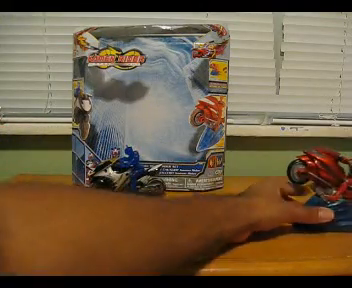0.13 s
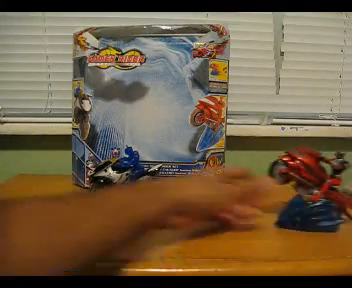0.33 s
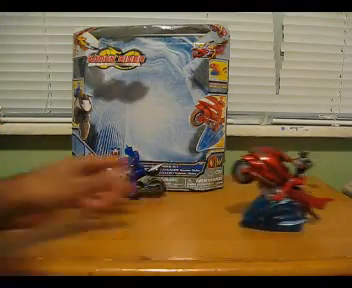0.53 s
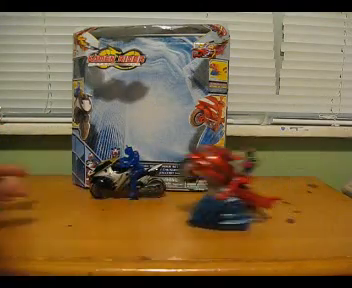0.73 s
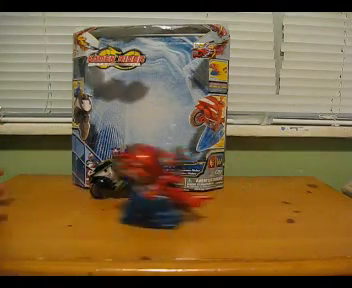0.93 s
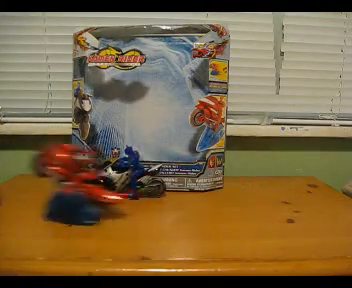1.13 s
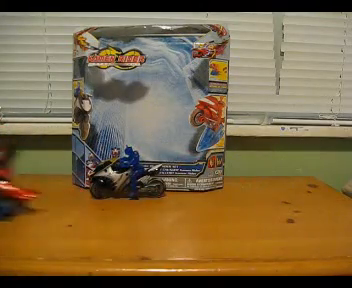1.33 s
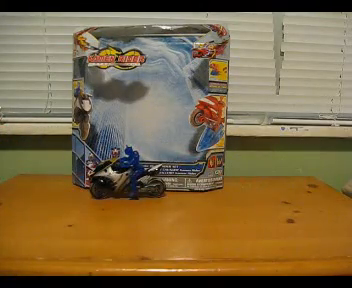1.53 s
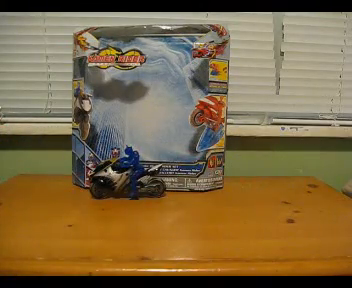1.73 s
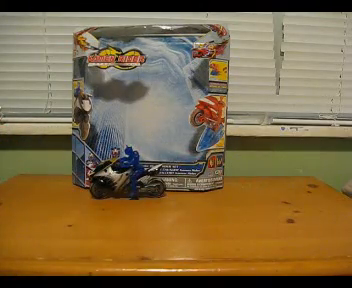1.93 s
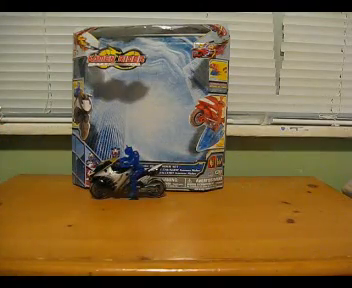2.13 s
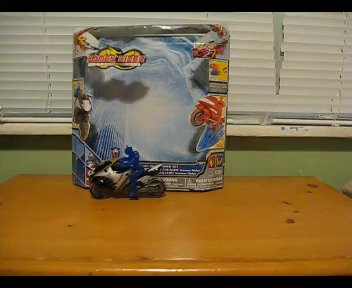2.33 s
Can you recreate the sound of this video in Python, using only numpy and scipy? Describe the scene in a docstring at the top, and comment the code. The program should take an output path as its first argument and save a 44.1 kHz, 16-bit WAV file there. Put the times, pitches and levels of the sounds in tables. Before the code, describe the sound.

A pull-back toy vehicle on a hollow wooden table: a faint handling bump at the start, near quiet, then light clicks from 0.4 s. From 0.55 s wheels rumble, gears whir and loose plastic clacks, strongest around 1.0-1.45 s. At about 1.5 s the unloaded gears whine up, peak near 1.65 s and fall by 1.9 s. Sparse ticks follow until 2.3 s, over soft hiss and faint electrical ticking in a small room.

```python
"""Pull-back toy on a hollow table

A pull-back toy rolls over a wooden table: wheel bumps ring the board, gears whir, the loose plastic shell clacks.
Lifted off, its gears race free: one pulse per tooth makes a whine that rises and falls. They tick to rest.
A small quiet room answers with a short noise-like tail; the camera adds shaped hiss and a faint electrical tick."""
import sys
import numpy as np
from scipy import signal
from scipy.fft import rfft, irfft, next_fast_len
from scipy.io import wavfile
from scipy.ndimage import uniform_filter1d, map_coordinates

SR = 44100
rng = np.random.default_rng(int(sys.argv[2]) if len(sys.argv) > 2 else 0)


def how_loud(loudness_db):
    """Turn decibels into a plain amplitude multiplier (0 dB gives 1, 20 dB gives 10)."""
    steps = np.asarray(loudness_db, float) / 20
    return 10 ** steps


def output_pcm(signal):
    """Save a mono or channel-first signal as 16-bit PCM at the path in sys.argv[1].

    Samples are clipped to [-1, 1] before scaling.
    """
    pcm = np.clip(np.atleast_2d(signal).T, -1, 1) * 32767
    wavfile.write(sys.argv[1], SR, np.round(pcm).astype(np.int16))


N = 110161  # length of the sound in samples

# Resonances of the table board: (centre [Hz], width [Hz], level [dB])
BOARD = [(160, 60, -6), (240, 24, -5), (322, 18, 5), (592, 34, -2), (825, 40, 3), (1088, 28, 2),
         (1310, 60, -2), (1525, 50, -4), (1790, 50, -4), (2250, 70, -5)]
# Resonances of the plastic toy shell: (centre [Hz], width [Hz], level [dB])
SHELL = [(2124, 200, -4.5), (3070, 124, 10), (4390, 330, 3), (5570, 124, 10.5), (6200, 570, -1),
         (9240, 170, -5)]
# Resonances of the gearbox: (centre [Hz], width [Hz], level [dB])
GEARBOX = [(2860, 380, -4), (4120, 440, 2.5), (5750, 800, -10)]


def unit(x):
    """Scales a sound to an rms of 1."""
    return x / np.sqrt(np.mean(x ** 2) + 1e-20)


def curves(rows):
    """One value per sample for each column; 60 dB lower outside the table."""
    s, *columns = np.transpose(rows)
    time = np.arange(N) / SR
    return [np.interp(time, s, c, left=c[0] - 60, right=c[-1] - 60) for c in columns]


def along(points, hz):
    """Reads a curve of (frequency, value) points on a logarithmic frequency scale."""
    f, value = np.transpose(points)
    return np.interp(np.log(hz + 1), np.log(f + 1), value)


def wobble(rate):
    """A smooth random curve with rate knots a second."""
    knots = rng.standard_normal(int(N * rate / SR) + 4)
    return map_coordinates(knots, [np.arange(N) * rate / SR])


def filtered(x, response):
    """Multiplies the spectrum by a response given as a function of frequency."""
    m = next_fast_len(x.shape[-1] + 8192)
    spectrum = rfft(x, m) * response(np.fft.rfftfreq(m, 1 / SR))
    return irfft(spectrum, m)[..., :x.shape[-1]]


def colour(x, points):
    """Shapes the tone with a curve of (frequency [Hz], level [dB]) points."""
    return filtered(x, lambda hz: how_loud(along(points, hz)))


def body(x, peaks, between_db):
    """Resonances of alternating sign over a flat direct path at between_db."""
    def response(f):
        total = how_loud(between_db)
        for k, (centre, width, db) in enumerate(peaks):
            resonance = 1j * f * width / (centre * centre - f * f + 1j * f * width)
            total = total + (-1) ** k * how_loud(db) * resonance
        return total
    return filtered(x, response)


def grit(rate, spread_db):
    """Random bumps of uneven size, about rate of them a second."""
    hits = rng.random(N) < rate / SR
    extra_db = spread_db * rng.exponential(size=N).clip(0, 3.5)
    return hits * rng.standard_normal(N) * how_loud(extra_db)


def hiss():
    """Steady random noise, shaped in tone like the camera's hiss."""
    # Tone of the hiss: (frequency [Hz], level [dB])
    hiss_tone = [(15, -52), (30, 2), (55, -10), (150, -8), (700, -3), (1400, -5.5), (2400, -12),
                 (5000, -19), (14400, -24)]
    return how_loud(-44.5) * unit(colour(rng.standard_normal(N), hiss_tone))


def buzz():
    """Electrical ticks of alternating sign: quick rise, exponential fall."""
    first_s, period_s = .0158, .02
    slip_after_s, slip_s = 1.2, -.0099  # the later ticks all come a little early
    rise_s, fall_s = .00004, .00019
    s = np.arange(first_s, N / SR, period_s)
    at = np.round((s + slip_s * (s > slip_after_s)) * SR).astype(int) - 3  # starts 3 samples ahead
    ticks, t = np.zeros(N + SR), np.arange(60) / SR
    ticks[at] = (-1.) ** np.arange(len(s)) * how_loud(rng.standard_normal(len(s)))
    shape = np.exp(-t / fall_s) * (1 - np.exp(-t / rise_s))
    return how_loud(-26.5) * np.convolve(ticks, shape)[:N]


def room(x):
    """Echoes blur into a short dying noise, different in each channel; high sounds die sooner."""
    # Time to fall by 60 dB: (frequency [Hz], time [s])
    decay = [(300, 0.44), (3000, 0.25), (10000, 0.14)]
    hz, t, z = signal.stft(rng.standard_normal((2, SR // 3)), SR, nperseg=256)
    tail = signal.istft(z * how_loud(-60 * t / along(decay, hz)[:, None]), SR, nperseg=256)[1]
    late = np.pad(x, (200, 0))[None]  # the answer starts 200 samples later
    return signal.fftconvolve(late, tail / np.linalg.norm(tail[0]), axes=1)[:, :N]


def free_run():
    """Unloaded gears: one uneven pulse per tooth, plus rattle, both ringing the gearbox."""
    # Speed of the gears: (time [s], teeth meeting [Hz], whine boost [dB])
    mesh = [(1.47, 400, 0), (1.51, 600, 2), (1.54, 845, 2), (1.57, 1060, 2), (1.6, 1300, 2),
            (1.62, 1395, 1), (1.65, 1520, -1), (1.68, 1420, -3), (1.71, 1350, -6), (1.75, 950, -9),
            (1.9, 400, -12)]
    # Free run and coast: (time [s], level [dB])
    free_level = [(1.46, -62), (1.466, -36.5), (1.558, -21.5), (1.62, -20.5), (1.746, -21), (1.892, -59),
                  (1.972, -41.5), (2.16, -48.5), (2.25, -55)]
    # Tone of the racing gears: (frequency [Hz], level [dB])
    race_tone = [(300, -50), (600, -22), (1200, -11), (2400, -8), (4200, -3), (6500, -6), (12000, -13),
                 (14500, -26)]
    jitter = .025  # timing scatter of a tooth, share of a period
    s, hz, boost_db = np.transpose(mesh)
    time = np.arange(N) / SR
    tooth_hz = np.interp(time, s, hz)
    teeth_passed = np.cumsum(tooth_hz * (1 + .008 * wobble(120))) / SR
    count = np.arange(1, int(teeth_passed[-1]))
    at = np.interp(count + jitter * rng.standard_normal(len(count)), teeth_passed, np.arange(N))

    # each pulse is spread over 16 samples so that it can fall between two samples
    taps = np.arange(-8, 8)
    lag = taps - (at % 1)[:, None]
    size = how_loud(0.5 * rng.standard_normal(len(at)))[:, None]
    pulses = size * np.sinc(lag) * np.cos(np.pi * lag / 18) ** 2
    places = (at.astype(int)[:, None] + taps).clip(0, N - 1)
    teeth = np.bincount(places.ravel(), pulses.ravel(), N)

    ringing = body(body(teeth, GEARBOX, between_db=-16), GEARBOX, between_db=-10)
    whine = colour(ringing, race_tone) / np.sqrt(tooth_hz)  # evens out the power of denser pulses
    fast = slice(round(s[4] * SR), round(s[7] * SR))  # this fast stretch sets the whine's scale
    whine = whine * how_loud(np.interp(time, s, boost_db) + 2 * wobble(60)) / np.std(whine[fast])
    rattle = unit(colour(body(grit(12000, spread_db=1.5), GEARBOX, between_db=-6), race_tone))
    level_db, = curves(free_level)
    return how_loud(level_db + 1.35 * wobble(90)) * (rattle + whine)


def rolling():
    """Wheel bumps ring the board; gear teeth chatter in the shell."""
    # The roll: (time [s], board setting [dB], deep part over it [dB], gear whir [dB])
    roll = [(0.0, -24.5, -9, -56), (0.022, -39.5, -41, -64), (0.154, -57, -4, -61), (0.548, -31, -1, -52),
            (0.556, -29.5, -2.5, -44), (0.632, -35.5, -9, -54), (0.694, -26, -0.5, -46.5),
            (0.802, -26, -14, -38.5), (0.846, -20.5, -4, -38.5), (0.966, -21.5, -8, -36),
            (1.202, -22, -4, -31), (1.266, -10, -24, -27.5), (1.288, -21, -7, -28), (1.346, -16, -21, -28),
            (1.376, -24.5, -27.5, -27.5), (1.438, -30, -32, -30.5), (1.5, -62, -19, -36),
            (1.532, -66, -42, -27), (1.558, -19, -65, -39), (1.6, -63, -57, -34)]
    # Tone of the board: (frequency [Hz], level [dB])
    rumble_tone = [(55, -40), (95, -9), (300, -4), (900, 0), (2000, -4), (3500, -16), (5000, -50)]
    # Tone of the gears: (frequency [Hz], level [dB])
    whir_tone = [(900, -20), (1800, -3.5), (4400, -13.5), (9000, -16), (12000, -25.5), (15000, -77)]
    board_db, deep_db, gear_db = curves(roll)
    bumps = grit(900, spread_db=2)
    modes = np.zeros(N)
    for k, mode in enumerate(BOARD):
        sway = how_loud(2.2 * wobble(20))  # each mode swells and fades as the wheels move along
        modes += (-1) ** k * sway * body(bumps, [mode], between_db=-120)
    board = colour(modes + how_loud(-12) * bumps, rumble_tone)

    deep = filtered(board, lambda hz: 1 / (1 + (hz / 470) ** 8))
    upper_wood = how_loud(2.45 * wobble(27.55)) * unit(board - deep)
    deep_wood = how_loud(np.minimum(deep_db, 6) + 2.3 * wobble(25.37)) * unit(deep)
    gears = unit(colour(body(grit(1100, spread_db=3), SHELL, between_db=-4), whir_tone))
    return how_loud(board_db - 7) * (upper_wood + deep_wood) + how_loud(gear_db + 1.34 * wobble(69.6)) * gears


def crack_burst(tilt_db):
    """A hard contact: noise that starts fast and dies fast, tilted in tone by tilt_db an octave."""
    # Tone of a crack: (frequency [Hz], level [dB])
    crack_tone = [(300, -88), (900, 0), (1800, 4), (3000, 2), (6500, -3.5), (9000, -8.5), (11000, -28)]
    t60_s, rise_s = .012, .001
    t = np.arange(SR // 20) / SR
    b = rng.standard_normal(len(t)) * how_loud(-60 * t / t60_s) * (1 - np.exp(-t / rise_s))
    tilt_db = np.clip(tilt_db, -18, 16)
    b = filtered(colour(b, crack_tone), lambda hz: how_loud(tilt_db * np.log2((hz + 50) / 4000)))
    return b / np.sqrt(np.max(uniform_filter1d(b ** 2, size=40)))  # its loudest moment becomes 1


def gear_ticks():
    """The last gear ticks: short cracks that ring the gearbox."""
    # Ticks: (time [s], strength [dB])
    last_ticks = [(1.9362, -20.5), (1.9544, -29), (1.9667, -23.5), (1.9794, -26), (2.013, -23),
                  (2.038, -31), (2.0514, -33), (2.066, -39), (2.0814, -24), (2.145, -27), (2.164, -27),
                  (2.2054, -27), (2.3146, -26.5)]
    tick = np.zeros(N)
    for s, db in last_ticks:
        i, burst = round(s * SR), crack_burst(tilt_db=0)
        tick[i:i + len(burst)] += how_loud(db - 5.5) * burst
    return body(tick, GEARBOX, between_db=-7.5)


def clacks():
    """Each clack: a short crack that rings the shell and a knock that rings the board."""
    # Clacks: (time [s], strength [dB], board knock over it [dB], brightness before limits [dB per octave])
    clack_list = [(0.0571, -28, 4, -1.5), (0.407, -26, -21, -4.5), (0.4774, -28.5, -13, -5),
                  (0.5028, -18.5, -15, -7), (0.5518, -13, 2.5, -5.5), (0.5717, -20, -8, -8),
                  (0.6607, -24.5, -16, -4.5), (0.701, -14.5, -9, 0), (0.7341, -20, -22, -0.5),
                  (0.7653, -19.5, -16, -1.5), (0.8161, -8.5, -23, -5), (0.8215, -11, 0, 17.5),
                  (0.8493, -9, 7, -5), (0.8756, -17, -4, 1), (0.8863, -17, -20, -3), (0.913, -15.5, -3, -1),
                  (0.9223, -10, 0, -2), (0.943, -29, -20, 15), (0.9574, -15.5, 10, -1),
                  (1.0317, -4.5, -28, 3), (1.045, -9, 3, 1), (1.1149, -5.5, 2.5, -1.5), (1.2, -3, -1, 0.5),
                  (1.2275, -14.5, 11.5, 4), (1.2613, -24, 8, 3), (1.2783, -11.5, 9.5, 4),
                  (1.2974, -8.5, -9, 3.5), (1.3514, -7.5, 0, -1.5), (1.3672, -13, -24.5, 5),
                  (1.4065, -11.5, 4, -5), (1.434, -5, -27, -5), (1.4386, -18, 11, -10),
                  (1.4563, -16.5, -13, -1.5), (1.5565, -12.5, 4.5, -8)]
    crack, knock = np.zeros(N), np.zeros(N)
    thump = np.hanning(90) * np.sin(2 * np.pi * 1250 * np.arange(90) / SR)
    for s, db, board_db, tilt_db in clack_list:
        i, burst = round(s * SR), crack_burst(tilt_db)
        crack[i:i + len(burst)] += how_loud(db - 10) * burst
        knock[i:i + 90] += how_loud(db + board_db) * thump
    return body(crack, SHELL, between_db=1.0) + body(knock, BOARD, between_db=-13)


def scene():
    """Adds the toy, its room, the hiss and the ticks as a middle and a side, then makes left and right."""
    # Tone of the room's side: (frequency [Hz], level [dB])
    side_tone = [(60, -20), (500, -24.5), (4000, -19.5), (9000, -11)]
    toy = free_run() + rolling() + clacks() + gear_ticks()
    near, wide = room(toy)
    mid = toy + how_loud(-8.5) * near + hiss() + buzz()
    side = -.035 * toy + colour(wide, side_tone)  # the toy sits a little to the right
    return np.array([mid + side, mid - side])


def top_cut(x):
    """Nothing passes above the cut-off."""
    return signal.sosfilt(signal.butter(12, 14390, fs=SR, output="sos"), x)


def record(dry):
    """Bass cut and soft clipping; bands far weaker than the whole sound and faint side bands drop out."""
    # Where a band drops out: (frequency [Hz], level against the whole sound [dB])
    kept = [(70, -70), (110, -44), (560, -35), (760, -59.5), (7000, -52), (9500, -51.5), (12000, -37.5),
            (14400, -37.5)]
    bass_cut_hz, ceiling = 41, .8
    ragged_db, side_gate_db = 5, -90.5  # random spread of the band levels; limit for side bands
    dry = filtered(dry, lambda hz: 1 / (1 + (bass_cut_hz / (hz + 1)) ** 6))
    left, right = dry / (1 + np.abs(dry / ceiling) ** 6) ** (1 / 6)
    hz, _, z = signal.stft([(left + right) / 2, (left - right) / 2], SR, nperseg=1536)

    def smooth(v):
        """Averages over neighbouring frequencies, then over time."""
        return uniform_filter1d(uniform_filter1d(v, size=10, axis=-2), size=2, axis=-1)

    ragged = how_loud(ragged_db * unit(smooth(rng.standard_normal(z.shape))))
    band = smooth(np.abs(z) ** 2) * ragged ** 2
    whole = uniform_filter1d(np.sum(np.abs(z[0]) ** 2, 0), size=4)
    strong = band[0] > whole * how_loud(along(kept, hz))[:, None] ** 2
    strong_side = strong & (band[1] > how_loud(side_gate_db) ** 2)
    mid, side = signal.istft(z * [strong, strong_side], SR, nperseg=1536)[1][:, :N]
    return top_cut(np.array([mid + side, mid - side]))


dry = scene()
out = record(dry)
output_pcm(out)
```